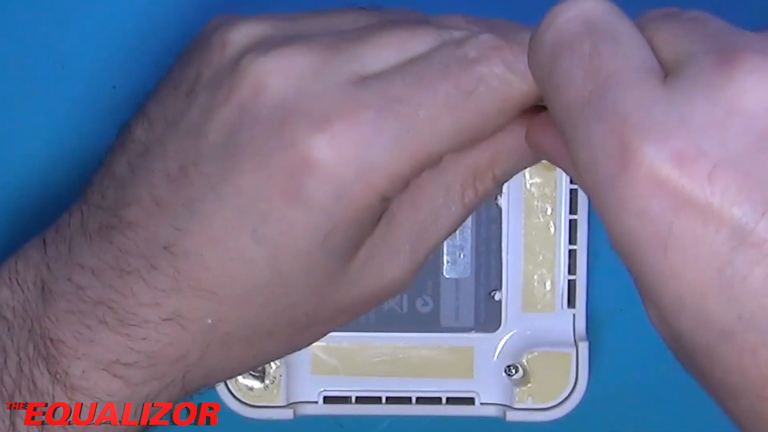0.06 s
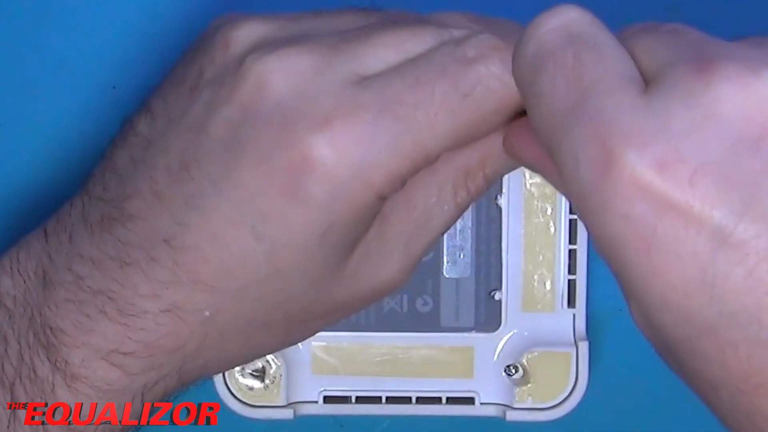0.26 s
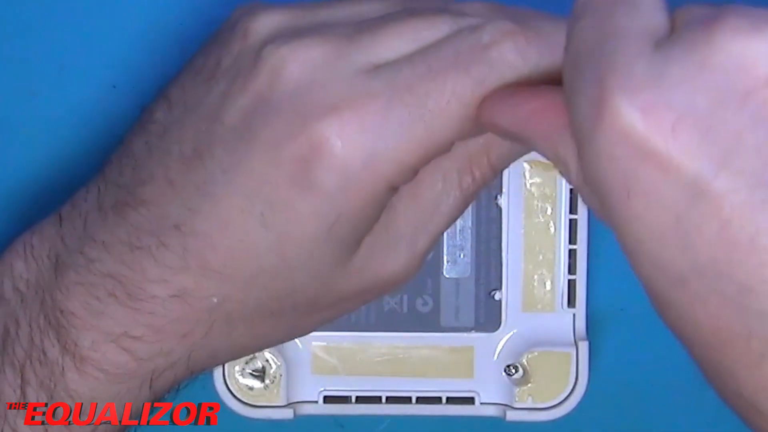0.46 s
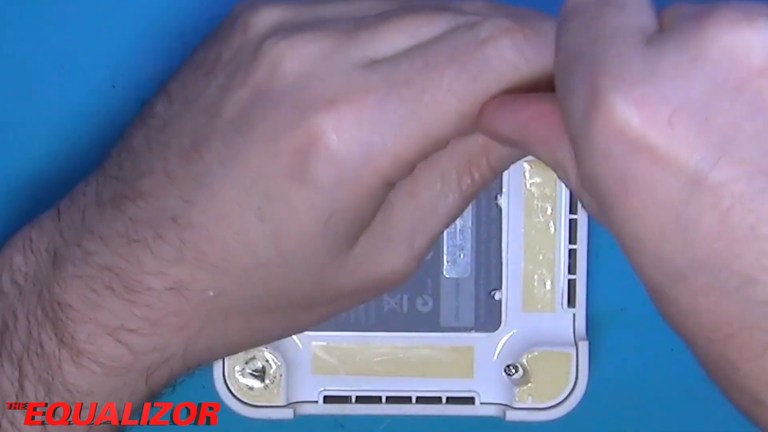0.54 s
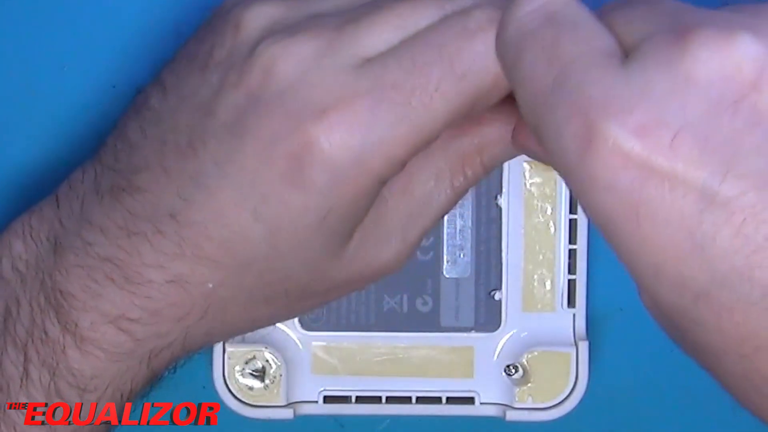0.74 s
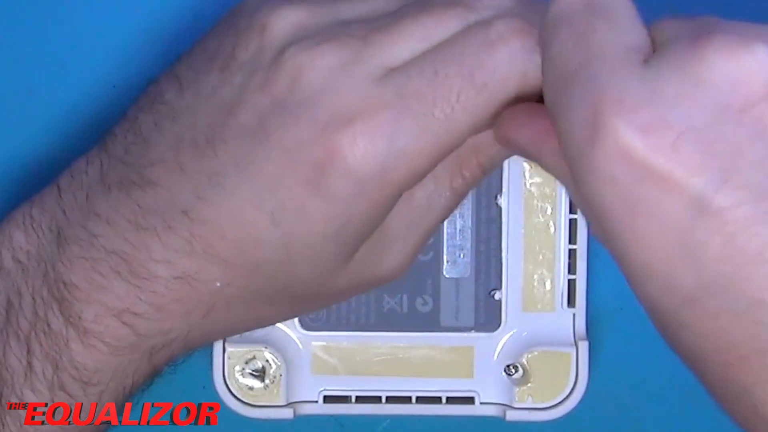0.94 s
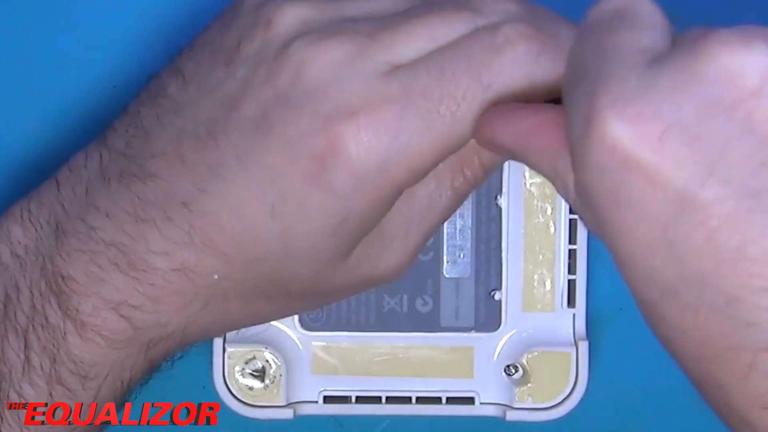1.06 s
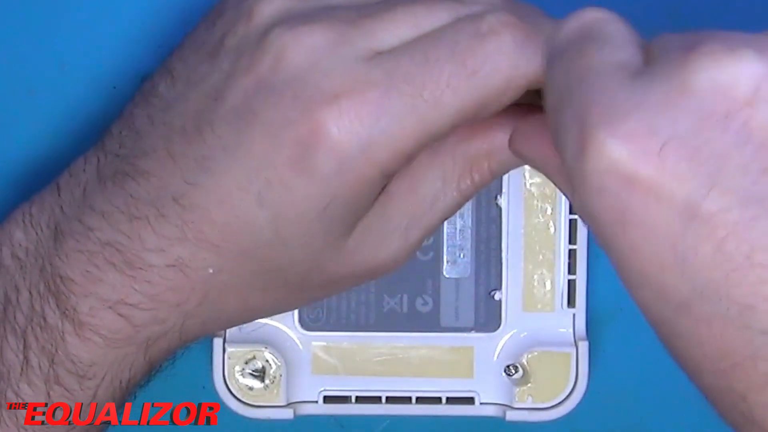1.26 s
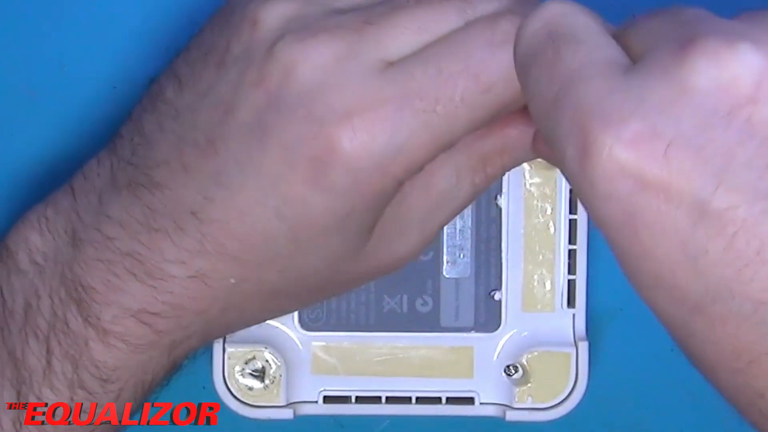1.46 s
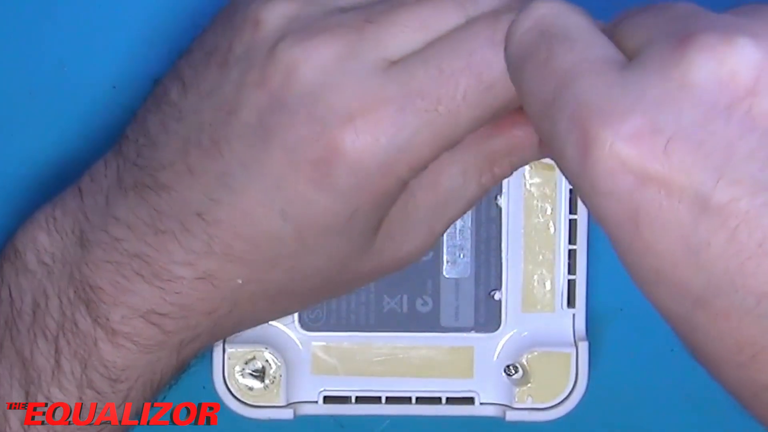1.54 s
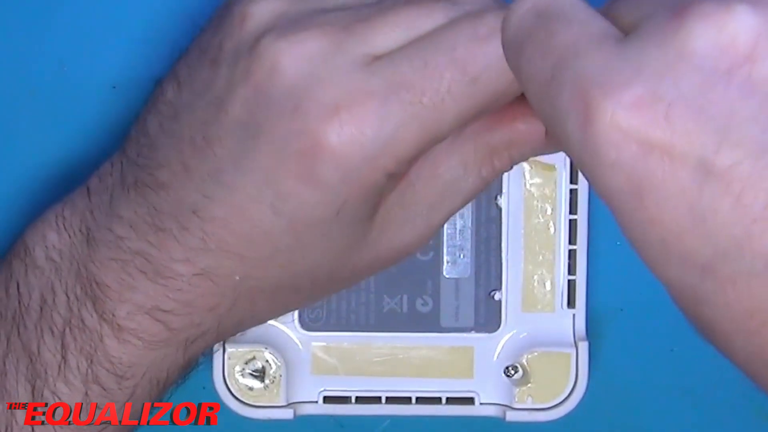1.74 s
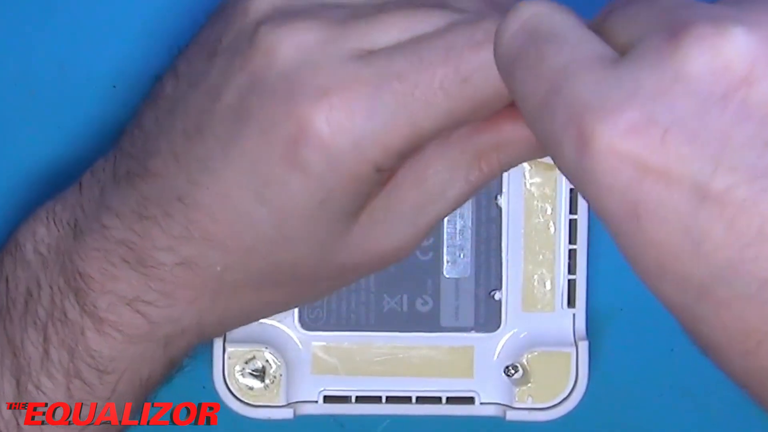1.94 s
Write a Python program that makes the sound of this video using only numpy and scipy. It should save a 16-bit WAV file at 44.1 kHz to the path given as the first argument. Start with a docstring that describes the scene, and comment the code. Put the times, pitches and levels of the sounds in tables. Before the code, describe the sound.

A screwdriver works tight screws in a plastic casing, close to the microphone in a small quiet room. Faint scraping clicks lead to a loud hollow snap at 0.2 seconds, then a softer one at 0.33. Hands rustle softly, with tiny clicks around 0.9 to 1.2 and a light knock at 1.44. Another sharp snap hits at 1.71, followed by fine rapid ticks from 1.85 to the end.

```python
"""A desk in a small room: a screwdriver works tight screws in a plastic casing, close to one microphone.
Skin rubs the handle, hands shift and rock the case: coloured friction noise and damped low tones.
The bit scrapes and slips, with two loud snaps and smaller clicks: noise cracks, a brief bit tone and
the decaying modes and rattle of the casing. Late on, the thread ticks in short noise bursts.
The room answers the tool and the box with a diffuse tail and one low resonance, over a quiet floor."""
import sys
import numpy as np
from scipy import signal
from scipy.fft import rfft, irfft, next_fast_len
from scipy.io import wavfile
from scipy.ndimage import uniform_filter1d, map_coordinates

SR = 44100
rng = np.random.default_rng(int(sys.argv[2]) if len(sys.argv) > 2 else 0)


def materialize(psi):
    """Save the field psi as 16-bit PCM at rate SR to the path in sys.argv[1].

    A 1-D psi becomes a single channel; in a 2-D psi each row is a channel.
    """
    bounded = np.clip(np.atleast_2d(psi).T, -1, 1)
    quanta = np.round(bounded * 32767).astype(np.int16)
    wavfile.write(sys.argv[1], SR, quanta)


N = 88200  # samples, two seconds
T = np.arange(SR // 3) / SR  # time within one short sound [s]

# Every colour table is a spectrum of relative levels: (frequency [Hz], level [dB]).
# Skin sliding on the handle, before the fine catching: (time [s], level [dB]), then its colour
SKIN_LEVEL = [(0, -56), (.11, -60), (.2, -55), (.42, -53.5), (.65, -56.5), (.78, -63.5), (.86, -71.5),
              (1.05, -72.5), (1.15, -77.5), (1.4, -77), (1.55, -73), (1.66, -73), (1.8, -68.5), (2, -69)]
SKIN_COLOUR = [(300, -10), (1700, -11), (2450, -1), (2700, -9.5), (3100, 0.5), (3600, -10), (4050, 2.5),
               (4350, -0.5), (4650, 2), (5300, -2), (6600, 3), (8000, -3.5), (9800, -6), (11300, -21)]
# Grip rubbing the casing: (time [s], level [dB]), then its colour
GRIP_LEVEL = [(0, -62.5), (.1, -62.5), (.35, -55), (.65, -61.5), (.8, -67.5), (.88, -81), (.96, -74),
              (1.08, -66.5), (1.23, -60.5), (1.4, -64), (1.53, -56), (1.66, -65), (1.84, -60), (2, -70)]
GRIP_COLOUR = [(30, -29.5), (100, -15), (250, -8.5), (345, -3), (430, 2), (740, -2), (850, 3), (1030, -9.5),
               (1200, -3), (1600, -9), (1740, -15), (2250, -6), (2900, -16.5), (6000, -21), (11000, -47.5)]
# Palm rubbing the box into a low hum: (time [s], level [dB]), then its colour
PALM_LEVEL = [(0, -57.5), (.02, -59), (.05, -65.5), (.3, -59.5), (.62, -60), (.82, -63.5), (.92, -84.5),
              (1.25, -64), (1.5, -67), (2, -66)]
PALM_COLOUR = [(100, -47.5), (280, -12), (345, -2), (420, -14), (800, -34.5), (3000, -69)]
# Quiet air of the room: (frequency [Hz], level [dB])
FLOOR_COLOUR = [(25, -23.5), (100, 1.5), (160, -6.5), (200, 10.5), (250, -9), (400, 1.5), (800, -8),
                (1600, -9.5), (3000, -12.5), (7000, -28), (11500, -17.5)]
FLOOR_DB = -70.5

# Diffuse tail of the room: colour (frequency [Hz], level [dB]), decay (frequency [Hz], T60 [s])
ROOM_COLOUR = [(40, -14), (200, 3.5), (300, -3), (480, 0), (800, -1), (1600, -8.5), (3000, 0.5),
               (6500, -6.5), (11000, -0.5)]
ROOM_DECAY = [(150, 0.7), (450, 0.15), (1500, 0.2), (4000, 0.15), (10000, 0.097)]
ROOM_DB, ROOM_RISE_S = -12.5, 0.0039
ROOM_MODE_HZ, ROOM_MODE_T60_S, ROOM_MODE_DB = 454, 0.27, -54.5

# The bit scrapes in the screw head: (time [s], length [s], level [dB]), then the colour
SCRAPES = [(.134, 0.0059, -52), (1.428, 0.027, -63.5), (1.863, .025, -57.5), (1.9006, 0.0183, -49.5),
           (1.923, 0.081, -66.5)]
SCRAPE_COLOUR = [(200, -11), (1200, -5), (2400, 5), (3500, -15.5), (4700, -0.5), (5700, -1), (6500, -10.5),
                 (11000, -19)]

# Slips of the bit: (time [s], casing knock level [dB], shell ring level [dB], crack level [dB],
# bit pitch [Hz], bit ring level [dB])
SLIPS = [(0.1378, -45, -42.5, -41.5, 4950, -41.5), (0.1669, -44, -45, -43.5, 4940, -48),
         (.185, -42, -44, -46, 5100, -46), (.1955, -52, -47, -49, 4200, -59),
         (0.2122, -8.5, -2, -13, 5280, -27), (0.3298, -23.5, -21.5, -45, 6440, -34.5),
         (.3855, -39, -43.5, -51, 6500, -54), (.4355, -47, -35.5, -48, 2180, -38),
         (.4375, -36, -48.5, -54, 1970, -36), (.4425, -53, -56, -69, 5740, -52),
         (0.9063, -63.5, -56, -55, 6246, -64), (0.9147, -55, -52.5, -63, 4300, -56),
         (0.9836, -49, -62, -77, 4190, -70), (0.9923, -55, -57, -75, 4300, -61),
         (1.1160, -61, -56.5, -55.5, 4370, -57), (1.166, -58, -58, -57, 4300, -67),
         (1.3723, -51.5, -48.5, -61, 6500, -68), (1.4419, -36, -30, -50, 4370, -37),
         (1.4536, -60, -35, -60, 4400, -48), (1.705, -19.5, -25, -22, 4200, -23),
         (1.7092, -8.5, -10.5, -16, 5020, -38), (1.7106, -35, -31, -21, 6110, -14.5),
         (1.849, -50, -46, -68, 4690, -65), (1.8704, -41, -46, -57, 4300, -47),
         (1.8790, -44.5, -52, -54, 4700, -54), (1.8864, -35.5, -40, -52, 4970, -47)]
# Colour of the crack of a slip: (frequency [Hz], level [dB])
CRACK_COLOUR = [(30, -22), (150, -11.5), (1000, -3), (2300, -4.5), (2900, -13.5), (4100, -0.5), (5800, 1),
                (7000, -6.5), (8300, -13.5), (9800, -10.5), (11500, -18.5)]
CRACK_T60_S, CRACK_RISE_S = 0.016, 0.00016
BIT_T60_S, BIT_WANDER_HZ = 0.014, 292
# Modes of the plastic casing: (frequency [Hz], relative level [dB], T60 [s])
CASING_MODES = [(221, -16.5, 0.029), (380, -14, 0.041), (526, -5, .04), (655, 0, .033), (860, -3, 0.027),
                (970, -10, 0.029), (1302, -5.5, 0.022), (1600, -.5, .031), (1790, -9.5, 0.024),
                (1800, -9, 0.011), (2068, -22.5, 0.016), (2280, -25.5, 0.021), (3304, -32.5, 0.047),
                (3880, -29, 0.015), (3940, -27.5, .024)]
SPLIT_HZ = 1130  # the whole box knocks below this, its thin shell rings above
KNOCK_RISE_S, SHELL_RISE_S = 0.00075, 0.00052
MODE_SCATTER_DB = 2.5  # random spread of each mode from blow to blow
RADIATE_HZ = 345  # the small box radiates little below this
# Loose parts of the shell rattling after each blow: (frequency [Hz], level [dB])
RATTLE_COLOUR = [(200, -40), (1100, -12), (1500, -4), (1900, 3.5), (2300, -7.5), (2800, -17.5), (3200, -14),
                 (3550, -16), (4050, -9.5), (4600, -18.5), (11000, -40.5)]
RATTLE_DB, RATTLE_T60_S = -16.5, 0.07  # level relative to the shell ring

# The box rocks under the hands: (time [s], pitch [Hz], level [dB], T60 [s])
ROCKS = [(.4375, 660, -36, 0.013), (.9160, 1058, -46, 0.024), (0.9922, 1054, -50, 0.042),
         (1.3745, 1030, -45, 0.022), (1.444, 1033, -31, .018), (1.4487, 432, -36.5, 0.021),
         (1.7103, 192.7, -33, 0.051), (1.713, 105, -48.5, 0.25), (1.8870, 494, -29.5, .02),
         (1.8935, 600, -31, 0.013)]

# The thread sticks and lets go: (time [s], level [dB]), then the colour of a tick
TICKS = [(1.845, -50), (1.8568, -48), (1.866, -57), (1.879, -50), (1.892, -47), (1.901, -49),
         (1.911, -40.5), (1.930, -49), (1.939, -54), (1.946, -51), (1.9605, -49.5), (1.975, -45.5)]
TICK_COLOUR = [(200, 7), (2300, -5), (3600, -21), (4700, 13), (5600, 1), (6500, -7), (11000, -35)]
TICK_T60_S = 0.0069
TICK_KNOCK_DB, TICK_SHELL_DB = -21, -9  # how strongly a tick drives the box and its shell

HEADROOM = 0.9  # full-scale amplitude the peaks approach
TOP_HZ = 11400  # upper band limit


def amp(db):
    """Decibels to gain."""
    return 10 ** (np.asarray(db) / 20)


def along(points, hz):
    """Interpolate (frequency, value) points along a log frequency axis."""
    f, v = np.transpose(points)
    return np.interp(np.log(hz + 1), np.log(f + 1), v)


def filtered(x, response):
    """Shape the spectrum of x by a gain that depends on frequency."""
    size = next_fast_len(len(x) + 8192)  # zero padding limits wrap-around
    hz = np.fft.rfftfreq(size, 1 / SR)
    return irfft(rfft(x, size) * response(hz), size)[:len(x)]


def noise(colour, size):
    """Coloured noise of rms 1."""
    x = filtered(rng.standard_normal(size), lambda hz: amp(along(colour, hz)))
    return x / x.std()


def fade(t60, rise):
    """A quick rise and an exponential decay of 60 dB in t60 seconds."""
    decay = np.exp(-np.log(1000) * T / t60)
    return decay * (1 - np.exp(-T / rise))


def flutter(rate, depth_db, size):
    """A smooth random gain through `rate` random knots a second."""
    knots = rng.standard_normal(int(size * rate / SR) + 4)
    return amp(depth_db * map_coordinates(knots, [np.arange(size) * rate / SR]))


def add(track, s, sound):
    """Mix a sound into the track at s seconds."""
    part = track[max(round(s * SR), 0):][:len(sound)]
    part += sound[:len(part)]


def rub(level, colour, grain_rate, grain_db):
    """Friction noise that follows the strokes of a hand and catches finely."""
    s, db = np.transpose(level)
    stroke = amp(np.interp(np.arange(N) / SR, s, db))
    return stroke * noise(colour, N) * flutter(grain_rate, grain_db, N)


def hands():
    """Skin slides on the handle; grip and palm rub the casing."""
    skin = rub(SKIN_LEVEL, SKIN_COLOUR, grain_rate=300, grain_db=0.44)
    grip = rub(GRIP_LEVEL, GRIP_COLOUR, grain_rate=240, grain_db=0.2)
    palm = rub(PALM_LEVEL, PALM_COLOUR, grain_rate=30, grain_db=0.8)
    return skin + grip + palm


def room_air():
    """Steady coloured noise of the quiet room."""
    return amp(FLOOR_DB) * noise(FLOOR_COLOUR, N)


def diffuse_tail():
    """Dense random reflections, each frequency dying at its own speed, scaled to unit energy."""
    hz, t, z = signal.stft(rng.standard_normal(len(T)), SR, nperseg=256)
    z = z * np.exp(-np.log(1000) * t / along(ROOM_DECAY, hz)[:, None])
    rise = 1 - np.exp(-T / ROOM_RISE_S)
    spectrum = rfft(signal.istft(z, SR, nperseg=256)[1][:len(T)] * rise)
    # even out the spectrum, then give it the colour of the room
    power = np.abs(uniform_filter1d(np.abs(spectrum) ** 2, size=25))
    spectrum /= np.sqrt(power + 1e-12)
    colour = amp(along(ROOM_COLOUR, np.fft.rfftfreq(len(T), 1 / SR)))
    tail = irfft(spectrum * colour, len(T))
    tail *= rise * np.clip((T[-1] - T) / 0.1, 0, 1) ** 2  # the last 0.1 s fades to silence
    return tail / np.linalg.norm(tail)


def room(x):
    """The direct sound, a freshly drawn diffuse tail and one low lingering resonance."""
    boom = np.sin(2 * np.pi * ROOM_MODE_HZ * T) * fade(ROOM_MODE_T60_S, ROOM_RISE_S)
    response = amp(ROOM_DB) * diffuse_tail() + amp(ROOM_MODE_DB) * boom
    return x + signal.fftconvolve(x, response)[:len(x)]


def scrapes():
    """Short gritty strokes of the bit in the screw head: noise with a fast random flutter."""
    out = np.zeros(N)
    for s, length, db in SCRAPES:
        stroke = np.clip(np.minimum(T, length - T) / 0.002, 0, 1)  # 2 ms ramps
        grit = noise(SCRAPE_COLOUR, len(T)) * flutter(600, 2.5, len(T))
        add(out, s, room(amp(db) * stroke * grit))
    return out


def unsteady(hz, wander_hz):
    """A tone whose pitch wanders through a thousand random knots a second."""
    wander = wander_hz * map_coordinates(rng.standard_normal(400), [T * 1000])
    return np.sin(2 * np.pi * np.cumsum(hz + wander) / SR)


def bit_ring(hz):
    """The steel bit rings briefly, its pitch unsteady as it rattles in the slot."""
    return unsteady(hz, BIT_WANDER_HZ) * fade(BIT_T60_S, CRACK_RISE_S)


def casing(knock_db, shell_db):
    """One ring of the box: low knock modes, higher shell modes and a short rattle, thin in the bass."""
    rattle = noise(RATTLE_COLOUR, len(T)) * fade(RATTLE_T60_S, SHELL_RISE_S)
    ring = amp(shell_db + RATTLE_DB) * rattle
    for hz, db, t60 in CASING_MODES:
        if hz < SPLIT_HZ:
            push_db, rise = knock_db, KNOCK_RISE_S
        else:
            push_db, rise = shell_db, SHELL_RISE_S
        level_db = push_db + db + MODE_SCATTER_DB * rng.standard_normal()
        ring += amp(level_db) * np.sin(2 * np.pi * hz * T) * fade(t60, rise)
    radiation = signal.butter(2, RADIATE_HZ, "highpass", fs=SR, output="sos")
    return signal.sosfilt(radiation, ring)


def slips():
    """Each slip cracks, rings the bit briefly and sets the casing's modes going."""
    out = np.zeros(N)
    for s, knock_db, shell_db, crack_db, bit_hz, bit_db in SLIPS:
        crack = amp(crack_db) * noise(CRACK_COLOUR, len(T)) * fade(CRACK_T60_S, CRACK_RISE_S)
        bit = amp(bit_db) * bit_ring(bit_hz)
        add(out, s, room(crack + bit + casing(knock_db, shell_db)))
    return out


def rocking():
    """Quickly damped knocks, each a decaying tone, of the box shifting on the desk."""
    out = np.zeros(N)
    for s, hz, db, t60 in ROCKS:
        knock = np.sin(2 * np.pi * hz * T) * fade(t60, KNOCK_RISE_S)
        add(out, s, room(amp(db) * knock))
    return out


def thread_ticks():
    """The thread sticks and lets go: tiny bright noise bursts that also ring the casing."""
    out = np.zeros(N)
    for s, db in TICKS:
        burst = noise(TICK_COLOUR, len(T)) * fade(TICK_T60_S, CRACK_RISE_S)
        tick = burst + casing(TICK_KNOCK_DB, TICK_SHELL_DB)
        add(out, s, room(amp(db) * tick))
    return out


def scene():
    """Hands, room air, tool and box at one close microphone."""
    return (hands() + room_air() + scrapes() + slips() + rocking() + thread_ticks())[None]


def record(dry):
    """The recorder thins the deep bass, rounds off the highest peaks and cuts steeply above its band."""
    bass_cut = signal.butter(2, 45, "highpass", fs=SR, output="sos")
    x = signal.sosfilt(bass_cut, dry[0])
    x = x / (1 + np.abs(x / HEADROOM) ** 10) ** (1 / 10)
    return filtered(x, lambda hz: 1 / np.hypot(1, (hz / TOP_HZ) ** 60))[None]


dry = scene()
out = record(dry)
materialize(out)
```